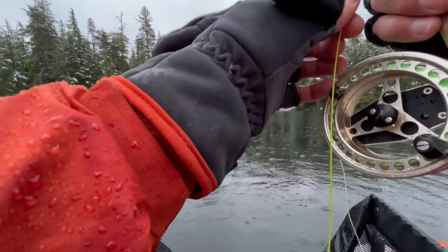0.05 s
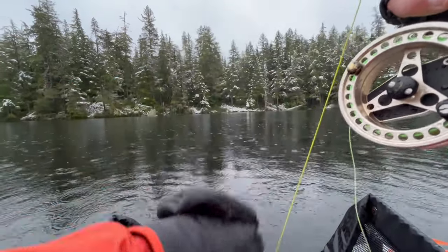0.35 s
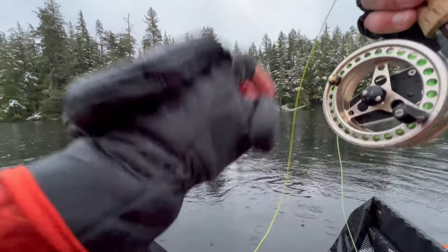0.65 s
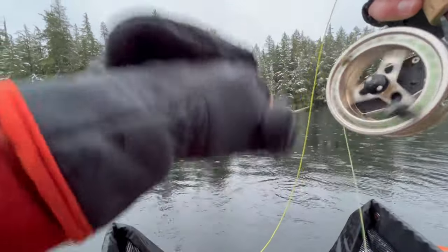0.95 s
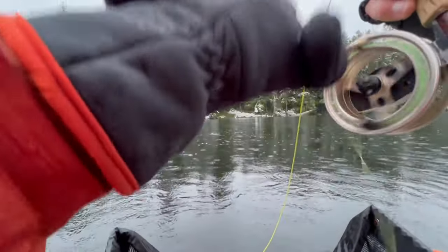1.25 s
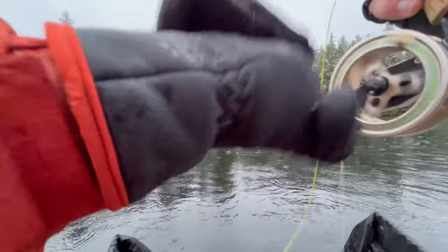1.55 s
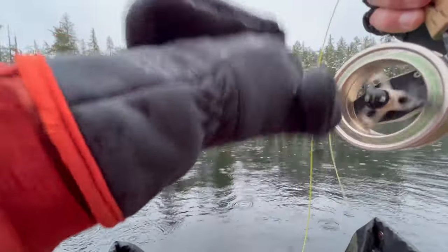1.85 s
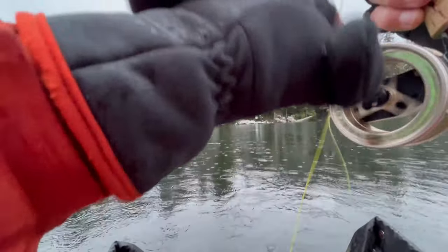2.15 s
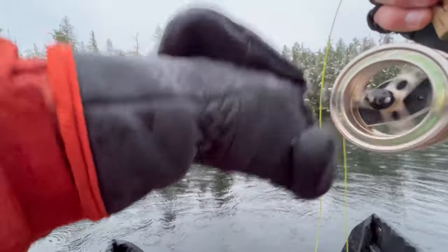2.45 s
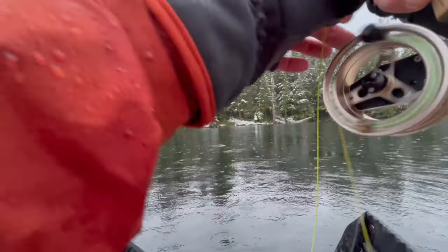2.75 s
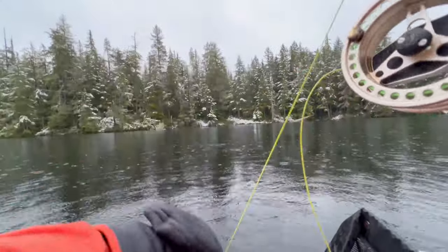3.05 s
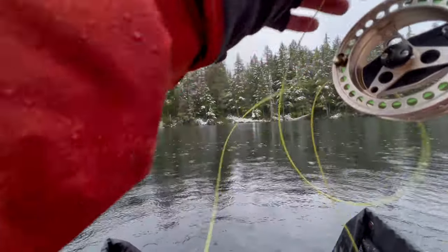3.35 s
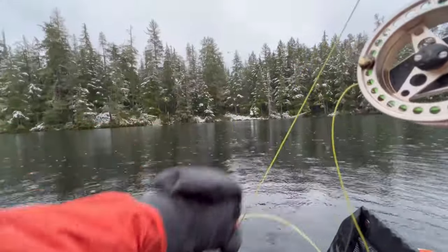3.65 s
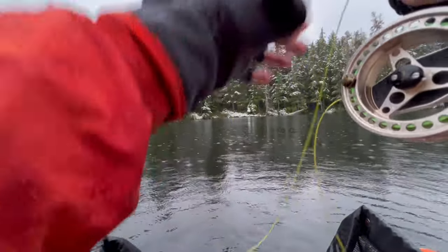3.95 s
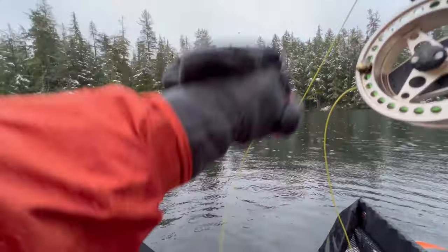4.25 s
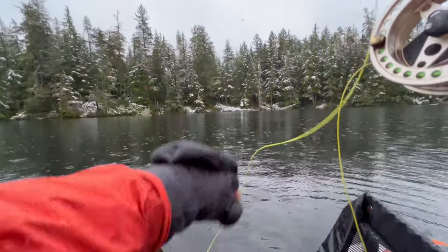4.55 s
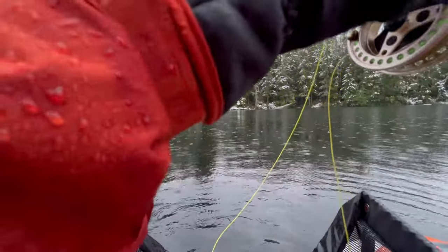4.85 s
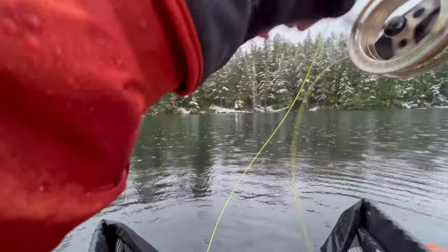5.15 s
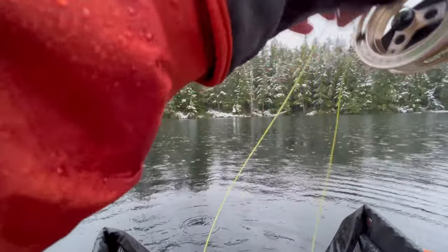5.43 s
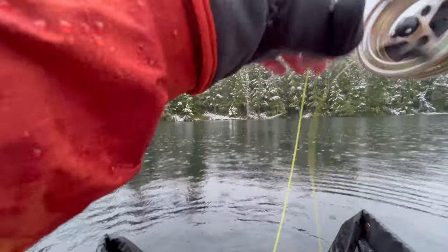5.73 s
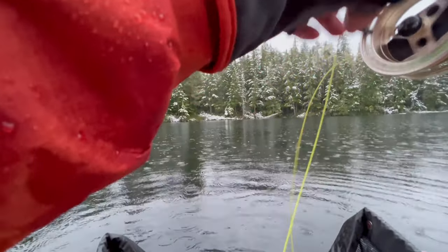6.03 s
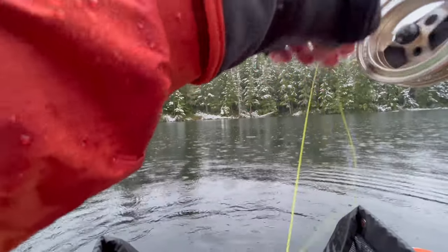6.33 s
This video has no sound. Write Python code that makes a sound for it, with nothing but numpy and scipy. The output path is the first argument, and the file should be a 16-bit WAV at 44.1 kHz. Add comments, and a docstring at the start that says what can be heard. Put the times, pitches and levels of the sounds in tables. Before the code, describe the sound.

Close bursts of fishing reel ratcheting, whistling pulls of line and sleeve rustle, over tapping drops and faint rain on a lake.

```python
"""Fly fishing in light rain

A small boat on a lake, with a phone microphone close to the reel. A gloved palm bats the spool round,
so the pawl clicks in quick runs that slow between pushes. Ribbed line, stripped by hand, zips up and
down in pitch over a rod guide. Drops tap nearby, a sleeve rustles, and rain hisses out on the water."""
import sys
import numpy as np
from scipy import signal
from scipy.fft import rfft, irfft, next_fast_len
from scipy.io import wavfile
from scipy.ndimage import uniform_filter1d

SR = 44100
rng = np.random.default_rng(int(sys.argv[2]) if len(sys.argv) > 2 else 0)


def to_wav(s):
    """Save 16-bit WAV."""
    ch = np.atleast_2d(s).T  # columns
    pcm = np.round(np.clip(ch, -1, 1) * 32767)  # PCM
    wavfile.write(sys.argv[1], SR, pcm.astype(np.int16))


N = 281799
TIME = np.arange(N) / SR
AGE = np.arange(SR // 12) / SR  # seconds since a blow
FFT_SIZE = 2 * next_fast_len(N // 2 + 4096)
FREQ = np.maximum(np.fft.rfftfreq(FFT_SIZE, 1 / SR), 1)

# Reel frame resonances, close up: centre_hz, width_hz, level_db, pan_db (left minus right throughout)
FRAME_MODES = [(1584, 400, -13.5, -18), (7490, 1050, 2.5, -1.5), (8650, 440, 1, -16.5), (9410, 220, 6, 2.5),
               (10030, 230, -4, -25), (11550, 530, -1.5, -10.5), (12150, 1350, -6, 12.5),
               (13100, 1100, -22, -34), (17200, 2600, -1, 2)]
# The reel's voice in each spell of winding: loud_tooth, level_db, ring_hz, width_hz, ring_db, pan_db
FIRST_SPELL = (6, -12, 5526, 612, 5, 6.5)
SECOND_SPELL = (9, -12.5, 5732, 469, 7.5, 6.5)
# The spool's lowest mode, damped more in the second spell: centre_hz, width_hz, level_db, pan_db
FIRST_RIM, SECOND_RIM = (3837, 640, -2, -2), (3755, 997, -5, -1.5)
# Single teeth and rebounds as the spool creeps on: start_s, level_db
CREEP_CLICKS = [(2.867, -1.5), (2.878, -7), (2.8938, 0), (2.906, -8), (2.923, 2.5), (2.937, -6),
                (2.9573, 2.5), (2.9932, -7), (3.037, 3), (3.0901, 1.5), (3.187, -0.5)]


def ratchet(speed, spell, rim, lone_clicks=(), hardness=1.1, split_hz=10400, mic_lag_s=.00027):
    """Each pawl blow is a bright crack and a longer chatter that travels round the reel's frame."""
    loud_tooth, level_db, *spool_mode = spell
    chatter_shape = swell(.0013) + undb(-22) * burst(.008, .001)
    shared_grain = rng.standard_normal((2, len(AGE)))  # like teeth chatter partly alike
    chatter, crack = np.zeros((2, N)), np.zeros(N)
    for start, db in [*pawl_blows(speed, loud_tooth), *lone_clicks]:
        grain = np.sqrt(.5) * (shared_grain + rng.standard_normal(shared_grain.shape))
        add(chatter, start - .0006, undb(db + level_db - 5) * grain * chatter_shape)
        # the spool's ring differs from tooth to tooth as the wheel turns
        ring_hz = spool_mode[0] * (1 + rng.uniform(-.09, .09, (2, 1)))
        ping = burst(.003, .0005) * np.sin(2 * np.pi * ring_hz * AGE)
        add(chatter, start, undb(db + level_db - 16 + 5 * rng.standard_normal()) * ping)
        crack_gain = undb(hardness * db + level_db - 4)  # harder blows are brighter
        add(crack, start - .0005, crack_gain * swell(.0012) * rng.standard_normal(len(AGE)))
    # the pawl scrapes between clicks, louder with each doubling of speed from 70 teeth a second
    doublings = np.log2(speed / 70 + 1e-9)
    chatter += undb(-32 + 17.5 * doublings) * noise()
    blows = cut(chatter, split_hz, "low") + cut(crack, split_hz, "high")
    left, right = colour(blows, resonances([*FRAME_MODES, rim, spool_mode]))
    return np.array([np.roll(left, round(mic_lag_s * SR)), right])  # the right microphone is nearer


# Teeth that catch harder than the rest: near_s, level_db
HARD_TEETH = [(1.62, 5), (2.215, 4), (2.328, 7), (2.706, 5), (2.759, 4), (2.798, 5), (5.336, 7), (5.42, 5),
              (5.561, 6), (5.607, 4), (5.761, 3), (5.777, 5), (5.873, 4), (6.033, 5), (6.168, 3),
              (6.316, 3)]


def pawl_blows(speed, loud_tooth, accent_db=3, rebound_share=.39, rebound_db=-11):
    """The pawl drops off each tooth and rebounds, biting hardest every fifth; gives start_s, level_db."""
    teeth_passed = np.cumsum(speed) / SR
    tooth = np.arange(int(teeth_passed[-1] + .5))
    scatter = rng.uniform(-1, 1, (len(tooth), 3)) * [3, .07, 5]
    tooth_scatter_db, timing_scatter, rebound_scatter_db = scatter.T
    strike_db = accent_db * np.cos(2 * np.pi * (tooth - loud_tooth) / 5) + tooth_scatter_db
    strike_s = np.interp(tooth + .5, teeth_passed, TIME)
    for near_s, db in HARD_TEETH:
        if strike_s[0] < near_s < strike_s[-1]:
            strike_db[np.argmin(abs(strike_s - near_s))] = db
    rebound_s = strike_s + (rebound_share + timing_scatter) * np.gradient(strike_s)
    return [*zip(strike_s, strike_db), *zip(rebound_s, rebound_db + rebound_scatter_db)]


# The palm bats the spool, beside the microphone: start_s, teeth_per_s, pick_up_s, drag_per_s, knock_db
PUSHES = [(0.907, 81.3, 0.0107, 2.52, -44.0), (1.196, 109.9, 0.0301, 2.61, -37.0),
          (1.425, 75.6, 0.0122, 2.37, -34.5), (1.62, 98.8, 0.0248, 2.41, -35.0),
          (1.831, 105.4, 0.0285, 2.22, -30.0), (2.045, 101.9, 0.0283, 2.22, -30.0),
          (2.266, 99.3, 0.0279, 2.18, -30.0), (2.502, 91.5, 0.0193, 2.13, -29.0),
          (5.073, 98.6, 0.0143, 2.13, -50.0), (5.334, 75.7, 0.0343, 3.05, -39.5),
          (5.548, 82.8, 0.0259, 2.61, -34.0), (5.748, 76.2, 0.0186, 2.4, -35.0),
          (5.948, 73.1, 0.0228, 2.6, -36.5), (6.145, 71.8, 0.0148, 2.94, -32.5),
          (6.346, 77.4, 0.0208, 1.91, -35.5)]


def spool_speed(start_s, stop_s):
    """Teeth per second: each push brings the spool up to speed, then drag slows it until the next."""
    speed = np.zeros(N)
    for push_s, teeth_per_s, pick_up_s, drag, _ in PUSHES:
        if start_s <= push_s < stop_s:
            i = int(push_s * SR)
            age = TIME[:N - i]
            coasting = teeth_per_s * np.exp(-drag * age)
            speed[i:] = coasting + (speed[i] - coasting) * np.exp(-age / pick_up_s)
    return speed * (TIME < stop_s)


# Resonances of the rod under the sliding line: centre_hz, width_hz, level_db, pan_db
ROD_MODES = [(347, 460, 1, 2), (1440, 180, 0.5, 1), (2250, 510, 2.5, -2), (3840, 300, 4.5, 2.5),
             (5570, 1500, 4.5, 6.5), (6080, 100, 3.5, 16.5), (7780, 1030, 1.5, 1), (11600, 1400, -12, 2.5)]
# The wire guide sings when swept by the rib rate or rubbed: centre_hz, width_hz, whistle_db, rub_db
GUIDE_RINGS = [(3840, 83, -4.5, -11), (6140, 120, 2.5, -9)]


def stripping(harmonics_db=(0, -1, -19), hiss_hz=10500):
    """Ribs on the line tick over the guide so fast that they whistle; pitch follows the hand's speed."""
    rib_hz, pace, force, pressure = line_motion()
    # the line chatters, so pitch and strength flutter
    phase = 2 * np.pi * np.cumsum(rib_hz * (1 + .022 * wander(1800))) / SR
    mic_phase = np.array([[0], [1.3]])  # radians, left and right
    harmonics = sum(undb(db + 4 * wander(280)) * np.sin(k * phase + mic_phase)
                    for k, db in enumerate(harmonics_db, 1))
    whistle = force * pace * harmonics  # slow line only scrapes
    hiss = force * undb(-1 + 2.05 * wander(1500)) * cut(noise(.011), hiss_hz, "low", order=1)
    rings = np.zeros((2, N))
    for hz, width, whistle_db, rub_db in GUIDE_RINGS:
        drive = pressure * (undb(whistle_db) * whistle + undb(rub_db) * hiss)
        rings += signal.lfilter(*signal.iirpeak(hz, hz / width, fs=SR), drive)
    return colour(whistle + rings + hiss, resonances(ROD_MODES))


# Hand pulls on the line: fastest_s, speeding_s, slowing_s, top_rib_hz, level_db, pressure_db
PULLS = [(0.398, 0.137, 0.097, 5870, -30.5, 2.5), (3.073, 0.1, 0.062, 9217, -30, -5),
         (3.701, 0.087, 0.089, 8435, -32, 14), (4.408, 0.14, 0.12, 6224, -33.5, 8.5)]


def line_motion(grip_hz=970, release_hz=1370, taut_hz=1800, ease_db=-3.5):
    """The hand's speed is a bell over each pull: it grips the line, draws it taut and lets it go."""
    rib_hz, pace, force, pressure = np.zeros((4, N))
    for fastest_s, speeding_s, slowing_s, top_hz, db, pressure_db in PULLS:
        rising = TIME < fastest_s
        width_s = np.where(rising, speeding_s, slowing_s)
        speed = np.exp(-abs((TIME - fastest_s) / width_s) ** 2.2)
        hz = top_hz * speed
        held = uniform_filter1d(1. * (hz > np.where(rising, grip_hz, release_hz)), size=400)
        tension = np.tanh(hz / taut_hz)
        rib_hz += hz
        pace += speed
        force += held * tension * undb(db + ease_db * speed)  # fast line rubs more lightly
        pressure += held * undb(pressure_db)
    return rib_hz, pace, force, np.maximum(pressure, 0)


# The glove closes on the line: start_s, level_db
SCUFFS = [(.232, -47), (3.548, -36), (4.209, -36)]


def glove_scuffs(decay_s=.015, above_hz=8000):
    """The glove rubs the line with a short bright hiss."""
    force = np.zeros(N)
    for start, db in SCUFFS:
        add(force, start, undb(db) * burst(decay_s, .001))
    return cut(force * noise(), above_hz, "high", order=2)


# Slack line hits the rod: start_s, level_db, decay_s
SLAPS = [(0.507, -35, 0.0064), (4.5039, -13, 0.0044), (4.509, -31, 0.0083), (4.5285, -32, 0.0052)]
# Spectrum of a slap: frequency_hz, level_db
SLAP_SPECTRUM = [(200, -15), (900, -10), (2300, 2), (3500, -7.5), (5800, -9), (9000, -25), (15000, -32)]


def line_slaps():
    """Loose line cracks against the rod at the end of a pull."""
    force = np.zeros(N)
    for start, db, decay_s in SLAPS:
        add(force, start, undb(db) * burst(decay_s, .00013))
    return colour(force * noise(.08), spectrum(SLAP_SPECTRUM))


# The hand jolts the rod as it takes or drops the line, right of the microphone: start_s, knock_db
JOLTS = [(0.237, -33), (2.932, -44), (3.139, -25.5)]


def rod_knocks(end_hz=150, fall_hz=480, thud_db=-41):
    """Each push or jolt sends a short falling knock through the rod; a push ends in a dull thud."""
    out = np.zeros((2, N))
    for start, *_, db in [*PUSHES, *JOLTS]:
        detune, stretch = np.exp(rng.uniform(-.15, .15, 2))
        hz = detune * (end_hz + fall_hz * np.exp(-AGE / (.00414 * stretch)))
        uneven_grip = 1 + .35 * unit(cut(rng.standard_normal(len(AGE)), 290, "low", order=2))
        knock = uneven_grip * swell(.0069) * sine(hz)
        add(out, start - .001, undb(db) * pan(-6.5) * knock)
    for start, *_ in PUSHES:
        thud = swell(.018) * np.sin(2 * np.pi * rng.uniform(52, 72) * AGE)
        add(out, start + .0086, undb(thud_db) * thud)
    return out


# Drops on the boat and clothing, near the microphone: start_s, level_db, pan_db
NEAR_DROPS = [(0.0218, -25, 6), (0.0782, -28.5, -14), (0.2628, -21, -12), (0.9754, -24.5, -17),
              (1.046, -23.5, -17), (1.1459, -19.5, -13), (1.21, -23, -12), (1.484, -16, -14),
              (1.6705, -16, -11), (1.75, -21.5, -12), (1.8845, -17.5, -15), (1.966, -19.5, -13),
              (2.098, -18, -14), (2.185, -20, -17), (2.319, -17.5, -13), (2.4107, -20.5, -17),
              (2.5107, -21.5, -16), (2.5568, -22.5, -15), (2.6483, -17.5, -10), (2.822, -22, -8),
              (2.8984, -19.5, -9), (3.262, -28, 24), (3.333, -29.5, 18), (3.3467, -28, 14),
              (3.4765, -29, -9), (3.6157, -23, 23), (3.6326, -24, 11), (3.9908, -34.5, 19),
              (4.0352, -30.5, 19), (4.078, -36, 20), (4.1572, -28, -14), (4.6946, -23.5, -5),
              (4.85, -32, 18), (4.9217, -29.5, 18), (5.616, -21, -11), (5.7042, -25.5, -12),
              (6.0057, -26, -3), (6.2044, -27, -14)]
# The hollow ring under a drop: pitch_hz, level_db, t60_s
DROP_MODES = [(1233, -4.5, 0.019), (1364, -3.5, 0.0091), (1670, -3, 0.0091), (2444, -5, 0.012),
              (3120, -10, 0.011)]


def raindrops(gain_db=2, faint_db=-47, tick_db=-12, faint_count=170):
    """Near drops tap with a tick and a short hollow ring; many fainter ones fall all round."""
    out = np.zeros((2, N))
    when, strength, side = rng.random((faint_count, 3)).T
    faint_drops = np.c_[when * TIME[-1], faint_db + 12 * strength, 14 * (side - .5)]
    for drops, pitch_spread in ((NEAR_DROPS, .06), (faint_drops, .25)):
        for start, db, pan_db in drops:
            detune = np.exp(pitch_spread * rng.standard_normal())
            ring = np.zeros(len(AGE))
            for hz, mode_db, t60_s in DROP_MODES:
                envelope = undb(mode_db + 2 * rng.standard_normal()) * burst(t60_s / np.log(1000), .0021)
                ring += envelope * np.sin(2 * np.pi * hz * detune * AGE)
            soft_noise = uniform_filter1d(rng.standard_normal(len(AGE)), size=4)
            tick = undb(tick_db) * burst(.0012, .0001) * soft_noise
            add(out, start, undb(db + gain_db) * pan(pan_db) * (ring + tick))
    return out


# Drops right on the phone: start_s, snap_db, ring_db, ring_hz, pan_db
SPLATS = [(0.0645, -15, -38, 1250, 20), (1.455, -13, -16.5, 1640, 13), (3.5347, -4, -26, 720, 29),
          (4.6434, -5.5, -21, 1040, 11.5)]


def phone_splats():
    """A drop hits the phone itself with a sharp snap and a very short ring."""
    out = np.zeros((2, N))
    for start, snap_db, ring_db, ring_hz, pan_db in SPLATS:
        snap = 3 * chirp(9960, 1020, glide_s=.000684, decay_s=.00038, rise_s=.0029)
        ring = 2 * chirp(2 * ring_hz, ring_hz, glide_s=.00037, decay_s=.00095, rise_s=.00066)
        add(out, start, pan(pan_db) * (undb(snap_db) * snap + undb(ring_db) * ring))
    return out


# How busy the arm is: time_s, level_db
ARM_EFFORT = [(0, -54), (.17, -68.5), (.45, -55.5), (.9, -49.5), (1.5, -48), (2.5, -50), (3.3, -47.5),
              (3.8, -54), (4.6, -54.5), (5.0, -55.5), (5.15, -49.5), (6.39, -55)]
# Swells of sleeve rustle and low rumble: arm swings, and the heavy thud after a hard push on the spool.
# middle_s, half_length_s, rustle_db, rumble_db
HANDLING_SWELLS = [(0.475, 0.1, -52.5, -47.5), (.94, 0.04, -75, -44.5), (1.452, 0.044, -45, -38.5),
                   (2.524, 0.017, -57, -36), (2.94, 0.027, -43, -40), (3.21, 0.12, -48, -58),
                   (3.35, 0.023, -42, -45), (3.59, 0.056, -42, -44), (4.017, 0.052, -50.5, -44),
                   (4.256, 0.05, -45.5, -43.5), (4.52, 0.057, -43, -52), (4.842, 0.023, -51.5, -64)]
# Spectra of the sleeve and of handling rumble, a little to the left: frequency_hz, level_db
SLEEVE_SPECTRUM = [(70, -17.5), (130, -2.5), (400, -1), (900, -6.5), (1600, -1), (2500, -9), (6500, -13.5),
                   (10000, -26.5), (16000, -31)]
RUMBLE_SPECTRUM = [(20, -36), (38, -9), (55, 0.5), (85, -1), (130, -5.5), (250, -12.5), (600, -42.5)]


def handling(push_rustle_db=-49, push_rumble_db=-51.5):
    """A waterproof sleeve crinkles and the hold rumbles, swelling with pushes, swings and a heavy thud."""
    effort = undb(np.interp(TIME, *np.transpose(ARM_EFFORT)))
    stir = sum(swell(.04, np.maximum(TIME - start, 0)) for start, *_ in PUSHES)
    rustle = np.hypot(effort, undb(push_rustle_db) * stir)
    shake = np.hypot(undb(-1.5) * effort, undb(push_rumble_db) * stir)
    for middle_s, half_s, rustle_db, rumble_db in HANDLING_SWELLS:
        envelope = np.exp(-((TIME - middle_s) / half_s) ** 2)
        rustle = np.hypot(rustle, undb(rustle_db) * envelope)
        shake = np.hypot(shake, undb(rumble_db) * envelope)
    crinkle = undb(3 + 4 * wander(250))
    sleeve = colour(noise(.066) * rustle * crinkle, spectrum(SLEEVE_SPECTRUM))
    rumble = colour(noise(.56), spectrum(RUMBLE_SPECTRUM)) * shake
    return pan(2.8) * (sleeve + rumble)


# The path of a faint tone, in the centre: time_s, pitch_hz, level_db
DRONE_PATH = [(.78, 220, -54), (0.839, 198.4, -47), (.89, 184.6, -41), (.925, 153, -40), (.96, 121, -63)]


def drone():
    """A soft, wavering low tone that sinks as the arm swings up to the reel."""
    time_s, hz, db = np.transpose(DRONE_PATH)
    pitch_hz = np.interp(TIME, time_s, hz) * (1 + .051 * wander(90))
    return np.interp(TIME, time_s, undb(db), left=0, right=0) * sine(pitch_hz)


# Spectrum of rain farther off, on the open water: frequency_hz, level_db
RAIN_SPECTRUM = [(30, -9), (70, -25.5), (170, 6), (400, -3.5), (800, -4), (1400, -6.5), (3800, -14),
                 (5700, -7), (8700, -7), (12000, -49), (16000, -9)]


def lake_rain(level_db=-55):
    """Rain on the lake merges into a grainy hiss."""
    patter = noise(.067) * undb(level_db + 3.4 * wander(700))
    return pan(4.3) * colour(patter, spectrum(RAIN_SPECTRUM))


def undb(db):
    """Decibels to gain."""
    return 10 ** (np.asarray(db) / 20)


def pan(db):
    """Left and right gains for a level difference."""
    return undb(np.array([[db], [-db]]) / 2)


def unit(x):
    """Scale to rms 1."""
    return x / np.sqrt(np.mean(x ** 2))


def noise(shared=0):
    """Stereo white noise whose channels share a part of their power."""
    return np.sqrt(1 - shared) * rng.standard_normal((2, N)) + np.sqrt(shared) * rng.standard_normal(N)


def wander(rate_hz):
    """Random drift of rms 1 that turns rate_hz times a second."""
    return unit(np.interp(TIME * rate_hz, np.arange(N // 8), rng.standard_normal(N // 8)))


def add(track, start_s, sound):
    """Mix a short sound into a track."""
    i = max(int(start_s * SR), 0)
    track[..., i:i + sound.shape[-1]] += sound[..., :N - i]


def burst(decay_s, rise_s):
    """Envelope of a short impact."""
    return (1 - np.exp(-AGE / rise_s)) * np.exp(-AGE / decay_s)


def swell(peak_s, age=AGE):
    """Rounded envelope that is 1 at its peak."""
    return (age / peak_s) ** 2 * np.exp(2 * (1 - age / peak_s))


def sine(hz):
    """A tone that follows a changing pitch."""
    return np.sin(2 * np.pi * np.cumsum(hz) / SR)


def chirp(from_hz, to_hz, glide_s, decay_s, rise_s):
    """A knock whose high part arrives first, as bending waves do."""
    return burst(decay_s, rise_s) * sine(to_hz + (from_hz - to_hz) * np.exp(-AGE / glide_s))


def cut(x, hz, kind, order=4):
    """Low-pass or high-pass."""
    return signal.sosfilt(signal.butter(order, hz, kind, fs=SR, output="sos"), x)


def spectrum(points):
    """Gain over frequency through points of frequency_hz, level_db."""
    hz, db = np.transpose(points)
    return undb(np.interp(np.log(FREQ), np.log(hz), db))


def resonances(modes):
    """Left and right gain over frequency of steep resonances, summed in power."""
    peaks = [undb(db) * pan(pan_db) / (1 + ((FREQ - hz) / (1.015 * width)) ** 2)
             for hz, width, db, pan_db in modes]
    return np.sqrt(sum(peak ** 2 for peak in peaks))


def colour(x, gain):
    """Minimum-phase filter of unit power: resonances ring after the blow."""
    cepstrum = irfft(np.log(unit(gain) + 1e-5))
    cepstrum[..., 1:FFT_SIZE // 2] *= 2
    cepstrum[..., FFT_SIZE // 2 + 1:] = 0
    return irfft(rfft(x, FFT_SIZE) * np.exp(rfft(cepstrum)))[..., :N]


def scene():
    """Open air: reel and line up close, hand and raindrops around them, the lake behind."""
    reel = ratchet(spool_speed(.9, 2.848), FIRST_SPELL, FIRST_RIM, CREEP_CLICKS)
    reel += ratchet(spool_speed(5.07, 6.39), SECOND_SPELL, SECOND_RIM)
    return (reel + stripping() + glove_scuffs() + rod_knocks() + drone()
            + raindrops() + phone_splats() + line_slaps() + handling() + lake_rain())


def record(dry):
    """The phone cuts the treble steeply above 15.9 kHz."""
    return signal.sosfilt(signal.ellip(8, .2, 70, 15900, fs=SR, output="sos"), dry)


dry = scene()
out = record(dry)
to_wav(out)
```